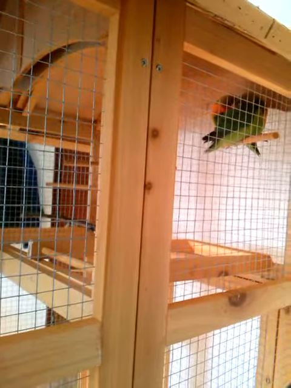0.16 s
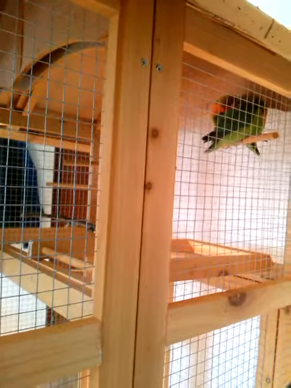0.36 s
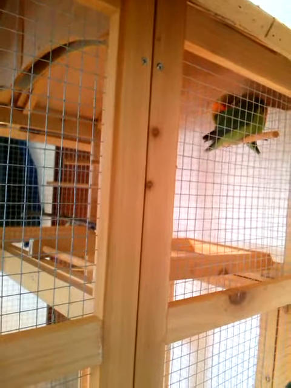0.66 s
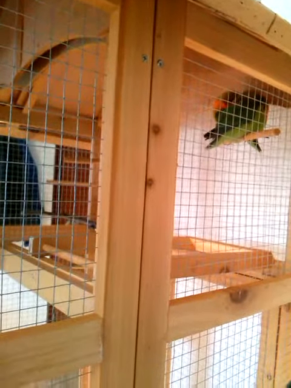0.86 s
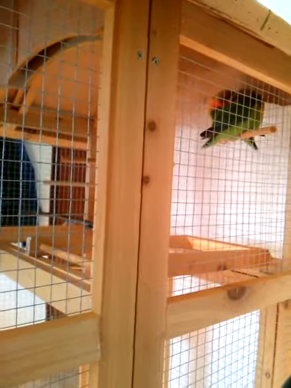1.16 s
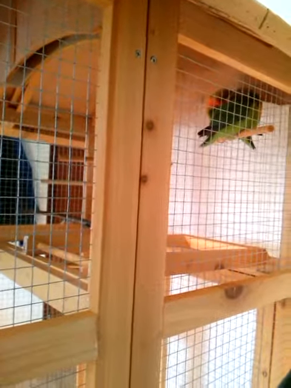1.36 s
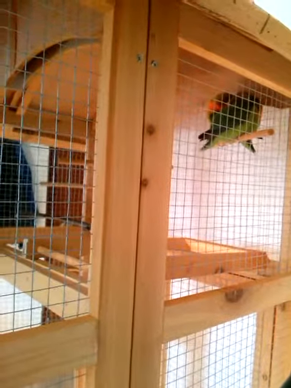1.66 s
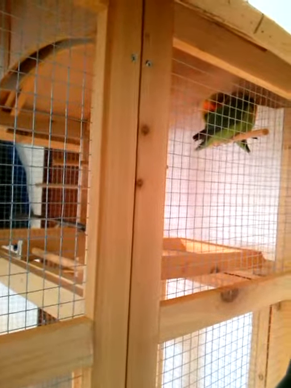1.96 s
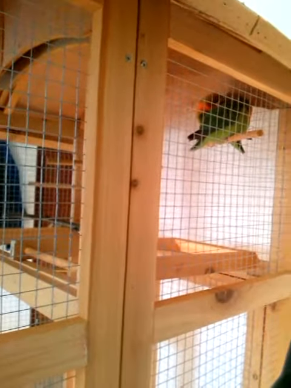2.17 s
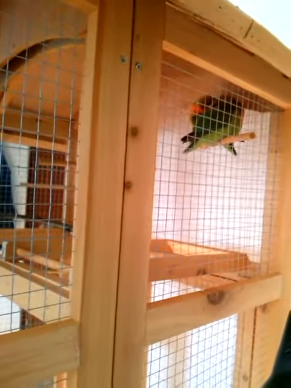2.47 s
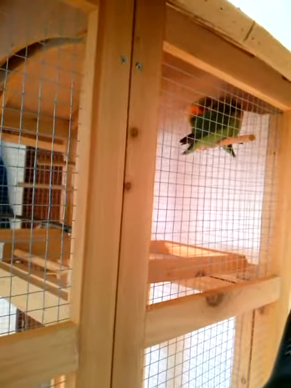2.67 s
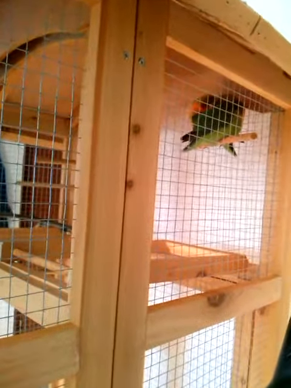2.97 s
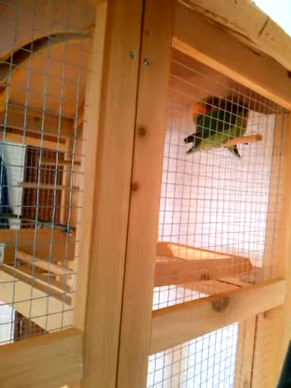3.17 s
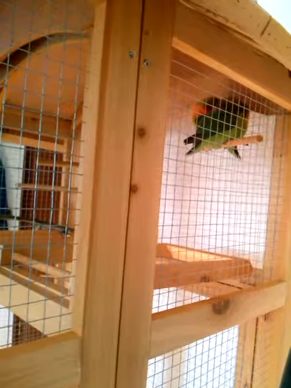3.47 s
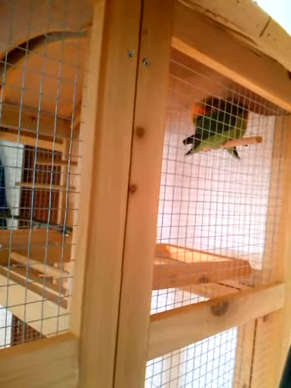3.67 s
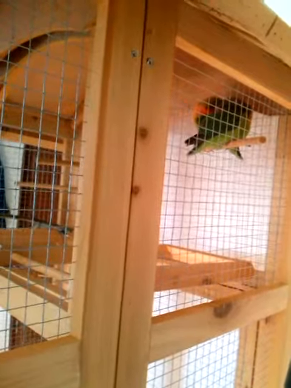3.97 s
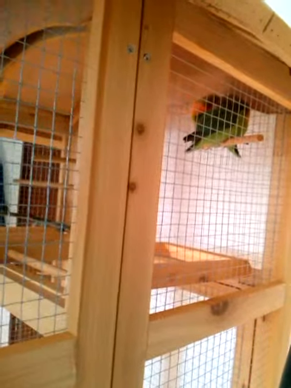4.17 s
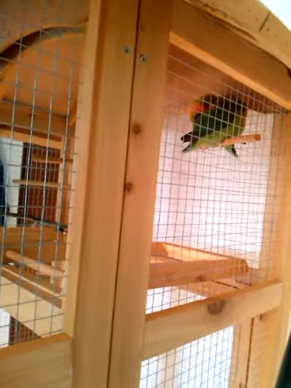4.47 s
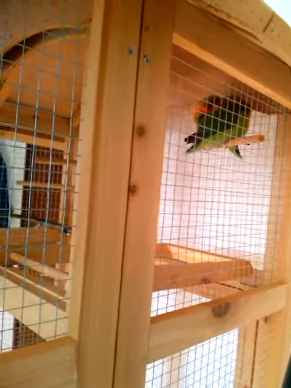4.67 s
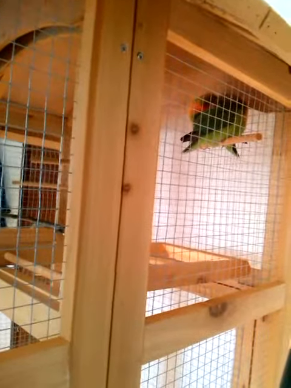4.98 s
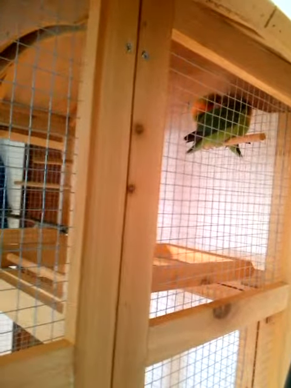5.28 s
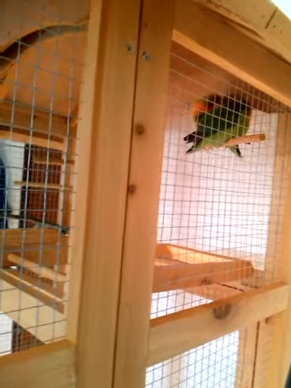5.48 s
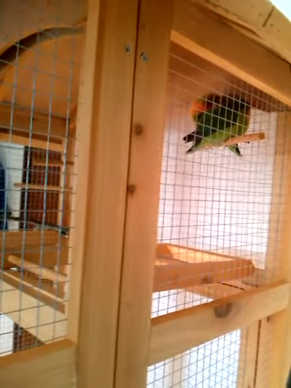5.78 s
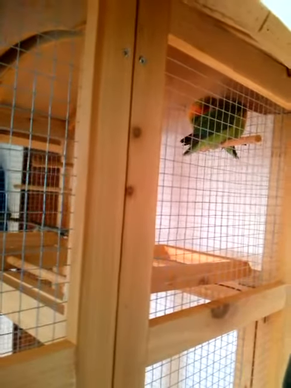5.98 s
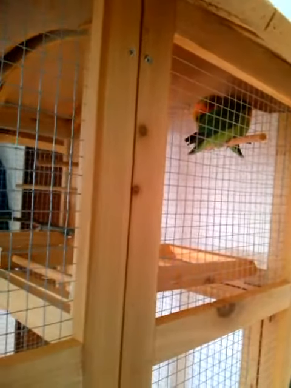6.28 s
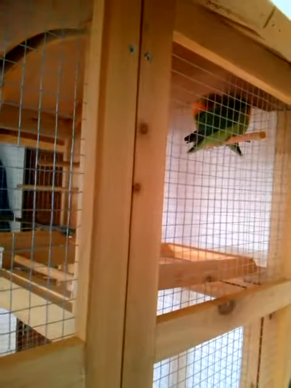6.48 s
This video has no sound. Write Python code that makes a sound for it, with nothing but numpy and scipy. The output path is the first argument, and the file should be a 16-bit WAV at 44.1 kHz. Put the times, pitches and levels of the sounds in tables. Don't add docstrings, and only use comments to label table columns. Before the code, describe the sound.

Very short, fast-gliding bird notes, some clear and piping, some nasal, raspy or rough, come from one small parrot. They cluster into quick bursts with gaps of up to about a second, the busiest in the second half. The microphone is fairly near in a lightly reverberant indoor room with a wooden enclosure. Underneath lies a very quiet low hum and soft noise, turned down gradually between calls.

```python
import sys
import numpy as np
from scipy import signal
from scipy.fft import rfft, irfft
from scipy.io import wavfile
from scipy.ndimage import uniform_filter1d

SR = 44100
rng = np.random.default_rng(int(sys.argv[2]) if len(sys.argv) > 2 else 0)


def int16_out(signal):
    q = np.round(np.clip(np.atleast_2d(signal).T, -1, 1) * 32767)
    wavfile.write(sys.argv[1], SR, q.astype(np.int16))


def attenuation_scalar(level_db):
    decades = np.asarray(level_db, float) / 20
    return 10 ** decades


N = 291942

# [start_s, length_ms, start_hz, end_hz, level_db]
SQUAWKS = [
    (0.0, 18, 4252, 5420, -32),
    (0.018, 20, 4334, 4160, -34.5),
    (1.581, 10.7, 2992, 3806, -34),
    (1.592, 6, 4400, 5700, -28),
    (1.598, 12, 5752, 5899, -28.5),
    (1.61, 13, 5567, 5164, -33),
    (1.828, 12.5, 2070, 2004, -45),
    (4.222, 13.88, 2199, 2476, -50),
    (5.995, 11.1, 2980, 2529, -37.5),
]
PEEPS = [
    (0.775, 8, 1660, 1709, -46),
    (0.8, 12, 1727, 1790, -58),
    (0.836, 18, 1904, 1980, -55.5),
    (0.866, 16, 1940, 1946, -59.5),
    (1.042, 14, 1833, 2020, -42.5),
    (2.945, 12, 1856, 1890, -42.5),
    (4.079, 5, 1586, 1560, -54),
    (4.7, 13, 2000, 2000, -42),
]
NASALS = [(0.66, 7, 2620, 2654, -49.5), (0.667, 13, 2854, 3160, -44.5), (1.165, 10.3, 3970, 3715, -42),
          (2.475, 9.3, 3493, 3170, -39.5), (2.757, 7, 4207, 4497, -31.5), (2.764, 6.5, 4682, 5566, -34.5),
          (3.803, 7.4, 2650, 3440, -47.5), (3.823, 9, 5760, 3600, -43), (3.878, 7.9, 5340, 5315, -34),
          (4.346, 13.5, 1857, 2346, -41), (4.36, 4.01, 4000, 5200, -40.5), (4.364, 6.02, 5398, 5900, -36),
          (4.514, 9.3, 4400, 4970, -39.5), (5.884, 12.4, 3592, 3834, -36.5), (5.896, 17, 3834, 3710, -40),
          (5.93, 21.5, 2938, 2843, -38)]
PINCHED = [
    (0.68, 12, 3550, 3508, -48.5),
    (0.93, 12, 3430, 3442, -53),
    (1.019, 8, 3206, 3376, -44.5),
    (1.14, 13, 3226, 3549, -45.5),
    (3.838, 12, 3500, 3330, -46),
    (3.872, 6, 3400, 5000, -50.5),
    (4.465, 15, 4420, 4216, -43.5),
    (5.278, 15, 3350, 3810, -43),
]
RASPS = [(0.918, 12, 1621, 3215, -45), (0.95, 6, 1645, 1520, -51.5), (1.718, 4.06, 3020, 3047, -47.5),
         (2.582, 3.37, 1123, 1135, -49.5), (2.59, 8.6, 3180, 3480, -44.5), (2.728, 9.9, 3700, 3499, -38),
         (2.738, 11.97, 3499, 3300, -44), (4.762, 12.1, 3216, 3150, -47), (5.265, 7.4, 3000, 3101, -43),
         (5.271, 7.02, 2887, 3202, -40.5), (5.39, 11.8, 4668, 4652, -42.5),
         (5.871, 12.8, 3407, 3040, -42.5), (6.327, 4.28, 2851, 3300, -37.5), (6.332, 6, 3300, 2900, -38.5),
         (6.338, 9, 4066, 4084, -36.5), (6.347, 6.4, 4540, 5496, -39)]
ROUGHS = [(1.726, 14.6, 1781, 1670, -43.5), (5.435, 20, 3612, 4400, -45), (1.027, 17.1, 2954, 1980, -40.5),
          (1.153, 11.8, 3400, 3020, -37.5), (1.817, 11.3, 3150, 2205, -34), (2.484, 8.08, 3205, 2900, -35),
          (2.492, 10, 2710, 2140, -41.5), (2.929, 12.5, 2920, 2180, -40.5), (4.386, 24, 2694, 2993, -38.5),
          (4.41, 21.6, 2977, 2990, -45), (4.607, 10.06, 2600, 1854, -41.5), (4.617, 9, 1823, 1607, -43.5),
          (4.687, 13.4, 3108, 2110, -37.5), (5.978, 18, 4380, 3690, -32), (6.029, 15.2, 3800, 3570, -37.5)]
PIPES = [(1.498, 9.1, 2700, 2200, -46), (1.507, 13, 2170, 2039, -45), (1.8, 8.8, 3090, 3360, -34),
         (1.809, 8, 3310, 3170, -31.5), (2.75, 7.4, 2950, 3910, -37), (3.831, 7, 3260, 2704, -40),
         (3.849, 23.34, 3604, 3363, -40), (4.438, 27, 3264, 2706, -38), (4.48, 17, 4560, 4000, -34.5),
         (4.497, 15.7, 3802, 3981, -31), (4.596, 4, 4550, 4200, -41.5), (4.6, 7, 3990, 2700, -35),
         (4.668, 9.96, 2840, 3245, -35.5), (4.678, 9, 3270, 3198, -33.5), (4.775, 22, 3105, 2573, -43.5),
         (5.295, 14.04, 3740, 3400, -37.5), (5.309, 9.74, 3336, 3062, -29.5),
         (5.319, 19, 3030, 2826, -33.5), (5.402, 18, 2300, 3204, -35), (5.42, 14.9, 3246, 3553, -36),
         (5.912, 18, 3723, 3050, -32), (6.005, 10.4, 2720, 3281, -31.5), (6.015, 10, 3290, 3333, -37)]
WHISTLES = [(1.897, 6.02, 5640, 5996, -33), (1.903, 18.7, 6304, 6760, -30.5), (2.687, 8, 6340, 6846, -27.5),
            (2.695, 25, 6880, 6880, -33.5), (2.72, 8, 6665, 4063, -31.5), (2.77, 18, 5660, 6110, -30),
            (4.37, 15.5, 6000, 5933, -34.5), (5.338, 6.02, 3300, 4698, -27), (5.344, 5.98, 4704, 6453, -28),
            (5.35, 10, 6270, 6270, -35), (5.95, 7.9, 5895, 6060, -36), (5.959, 17, 5995, 5350, -33.5)]

# [partial_2_db, partial_3_db, partial_4_db, breath_db, swell_db]
VOICES = [(-13.5, -20, -17.5, -17, -4), (-9, -5.5, -8.5, -28.5, 0.5), (-1.5, -5, -3.5, -20, -2.5),
          (-9, -5.5, -7, -21.5, -6), (-11, -12, -9, -12.5, -6), (-6.5, -19, -40, -22, -3.5),
          (6.5, -0.3, -4.5, -14, 2.5), (-8.5, -5.5, -16, -7, -3.5)]
HOARSENESS = (.2, .15, .25, .45, .7, .25, .2, .85)
GLIDE_EASE = (1.79, 1.8, 1.492, 1.8, 1.8, 2.2, 1.5, 1.5)
FALL_EASE = 1.2

# [centre_hz, width_hz, lift_db]
WINDPIPE = [(3300, 3400, 2.5), (6880, 3900, 2.5), (9420, 1700, 5), (14200, 490, 6), (15600, 2800, -4.5)]
# [centre_hz, width_hz, level_db]
LINGERING = [(2455, 87, -46), (3700, 480, -31), (5350, 480, -28.5), (7100, 900, -43.5), (11600, 680, -44)]
# [centre_hz, t60_s, level_db]
ROOM = [(1006.6, 0.86, 0.5), (1530, 0.48, -1), (2000, 0.4, 6), (2600, 0.36, -3.5), (3400, 0.39, 1.5),
        (4400, 0.44, -1.5), (5700, 0.34, -3.5), (7950, 0.39, -7.5), (12100, 0.24, -7)]
# [centre_hz, level_db per Hz]
ROOM_NOISE = [(12, -43), (20, -11), (32, -15), (68, -7), (85, -17.5), (107, -8.5), (145, -11.5),
              (268, -11.5), (300, -12.5), (345, -13), (2500, -23), (11300, -27), (15800, -28)]
# [start_s, peak_db, pitch_hz]
CLUCKS = [(0.939, -50, 762), (1.161, -54.5, 1112), (1.519, -54.5, 1119), (1.726, -53.5, 912),
          (2.582, -52.5, 1288), (2.733, -52, 1286), (2.941, -54, 890), (4.416, -47.5, 1273),
          (4.773, -50, 1070), (5.385, -47, 1160), (5.942, -51, 1274), (6.326, -57, 1107)]

OVERTONE_TOP_HZ, OVERTONE_FALL_DB = 14500, 75.5
BREATH_AT_DB, BREATH_LAG = -35.5, 0.44
ONSET_SWELL_DB, ENDING_FADE_DB = 3.5, -4.5
JOINED_S = 0.004
PUFF_S, PUFF_DB = 0.0016, 1
BOX_T60_S, BOX_DB = 0.05, 0
ROOM_NOISE_DB = -58.5
HUM_HZ, HUM_DB = 99.6, -68
HISS_DB = -81.5
OFFSET = -0.0005


def rms_one(x):
    return x / np.sqrt(np.mean(x ** 2) + 1e-20)


def at_hz(points, hz, axis=1):
    points = np.array(points)
    return np.interp(np.log(hz), np.log(points[:, 0]), points[:, axis])


def band(x, low_hz, high_hz):
    sos = signal.butter(2, [low_hz, min(high_hz, 0.45 * SR)], "band", fs=SR, output="sos")
    return signal.sosfilt(sos, x)


def wobble(low_hz, high_hz):
    return rms_one(band(rng.standard_normal(N), low_hz, high_hz))


def smooth(x, ms):
    size = max(round(ms * SR / 1000), 1)
    once = uniform_filter1d(x, size, mode="nearest")
    return uniform_filter1d(once, size, mode="nearest")


def syrinx_controls():
    hz, hoarse, gains = np.zeros(N), np.zeros(N), np.zeros((5, N))
    tables = (PEEPS, PIPES, NASALS, ROUGHS, SQUAWKS, WHISTLES, PINCHED, RASPS)
    notes = sorted((*row, voice) for voice, table in enumerate(tables) for row in table)
    begins = np.array([note[0] for note in notes])
    ends = np.array([note[0] + note[1] / 1000 for note in notes])
    pauses = np.r_[True, begins[1:] - ends[:-1] > JOINED_S, True]
    free = 0
    for note, first, last in zip(notes, pauses, pauses[1:]):
        start_s, length_ms, start_hz, end_hz, level_db, voice = note
        i = max(round(start_s * SR), 0)
        u = np.linspace(0, 1, round(length_ms * SR / 1000))
        hz[min((free + i) // 2, i):] = start_hz
        free = i + len(u)
        ease = GLIDE_EASE[voice] * (FALL_EASE if end_hz < start_hz else 1)
        hz[i:free] = end_hz + (start_hz - end_hz) * (1 - u) ** ease
        hz[free:] = end_hz
        *overtones_db, breath_db, swell_db = VOICES[voice]
        breath_db = breath_db - BREATH_LAG * (level_db - BREATH_AT_DB)
        colour_db = np.array([0, *overtones_db, breath_db])
        swell_db += ONSET_SWELL_DB * first + ENDING_FADE_DB * last
        gains[:, i:] = 0
        gains[:, i:free] = attenuation_scalar(level_db + colour_db[:, None] + swell_db * (u - 0.5))
        gains[4, i:i + round(PUFF_S * SR)] *= attenuation_scalar(PUFF_DB * first)
        hoarse[i:] = HOARSENESS[voice]
    octaves_above = np.log2(np.maximum(np.arange(3, 5)[:, None] * hz / OVERTONE_TOP_HZ, 1))
    gains[2:4] *= attenuation_scalar(-OVERTONE_FALL_DB * octaves_above)
    return smooth(hz, 0.5), smooth(gains, 0.3), hoarse


def windpipe(hz):
    lift_db = sum(db / (1 + (2 * (hz - centre) / width) ** 2) for centre, width, db in WINDPIPE)
    return attenuation_scalar(lift_db - 3.0)


def parrot():
    hz, gains, hoarse = syrinx_controls()
    jitter = (0.004 + 0.055 * hoarse) * wobble(150, 900)
    phase = 2 * np.pi * np.cumsum(hz * (1 + jitter)) / SR
    tone = np.zeros(N)
    for k in range(1, 6):
        gain = gains[k - 1] if k < 5 else gains[3] * attenuation_scalar(-2.0)
        flutter = 1 + 0.42 * wobble(40, 200) + 0.66 * hoarse * wobble(150, 530)
        gain = np.sqrt(2) * gain * windpipe(k * hz) * (k * hz < 16000)
        tone += gain * flutter * np.sin(k * phase)
    halves = attenuation_scalar(-42.5) * np.sin(phase / 2) + attenuation_scalar(-13.5) * np.sin(3 * phase / 2)
    tone += gains[0] * hoarse ** 2 * wobble(32.6, 160) * halves
    puffs = 1 + 0.29 * np.cos(phase)
    breath = band(wobble(2100, 16000), 1700, 15000) * puffs
    return tone + attenuation_scalar(1.5) * gains[4] * breath


def lingering():
    t = np.arange(N) / SR
    out = np.zeros(N)
    for hz, width, level_db in LINGERING:
        fade = attenuation_scalar(level_db - 60 * t / at_hz(ROOM, hz))
        out += fade * wobble(hz - width / 2, hz + width / 2)
    return out


def aviary(x):
    t = np.arange(round(0.8 * SR)) / SR
    white = rng.standard_normal((3, len(t)))
    edges = 600 * 2 ** np.arange(0, 5.1, 1 / 3)
    tail = np.zeros(len(t))
    for k, (low, high) in enumerate(zip(edges, edges[1:])):
        hz = np.sqrt(low * high)
        fall = attenuation_scalar(-60 * t / at_hz(ROOM, hz))
        level = attenuation_scalar(at_hz(ROOM, hz, axis=2)) / np.sqrt(np.sum(fall ** 2))
        tail += level * band(white[k % 2], low, high) * fall
    tail *= np.clip((t - 0.003) / 0.021, 0, 1)
    box = white[2] * attenuation_scalar(-60 * t / BOX_T60_S) * (t > 0.002)
    box *= attenuation_scalar(BOX_DB) / np.sqrt(np.sum(box ** 2))
    return signal.fftconvolve(x, tail + box)[:N]


def room_noise():
    hz = np.maximum(np.arange(N // 2 + 1) * SR / N, 10)
    noise = irfft(rfft(rng.standard_normal(N)) * attenuation_scalar(at_hz(ROOM_NOISE, hz)), N)
    hum = np.sqrt(2) * np.sin(2 * np.pi * HUM_HZ * np.arange(N) / SR)
    hum *= 1 + 0.17 * wobble(1.5, 8.0)
    return attenuation_scalar(ROOM_NOISE_DB) * rms_one(noise) + attenuation_scalar(HUM_DB) * hum


def clucks():
    out = np.zeros(N)
    u = np.linspace(0, 1, round(0.019 * SR))
    swell = np.sin(np.pi * u ** 0.41)
    shake = 0.5 + wobble(60, 450)
    for start_s, peak_db, pitch_hz in CLUCKS:
        i = round(start_s * SR)
        tone = np.sin(2 * np.pi * pitch_hz * np.arange(len(u)) / SR)
        out[i:i + len(u)] += attenuation_scalar(peak_db - 1.0) * swell * tone
    return out * shake


def scene():
    bird = parrot() + clucks()
    mix = bird + aviary(bird) + lingering() + room_noise()
    return mix[None]


def expander(x, open_db, slope, release_db_s, attack_s):
    sink = release_db_s * np.arange(N) / SR
    level_db = 10 * np.log10(smooth(x ** 2, 42.0) + 1e-12)
    held_db = np.maximum.accumulate(level_db + sink, axis=-1) - sink
    keep = np.exp(-1 / (attack_s * SR))
    gain_db = slope * np.minimum(held_db - open_db, 0)
    return x * attenuation_scalar(signal.lfilter([1 - keep], [1, -keep], gain_db))


def roll_off(x):
    return signal.sosfilt(signal.butter(12, 15960, fs=SR, output="sos"), x)


def record(dry):
    x = expander(dry, open_db=-40.5, slope=0.47, release_db_s=53.5, attack_s=0.068)
    x = 0.24 * np.tanh(x / 0.24)
    hiss = attenuation_scalar(HISS_DB) * wobble(4500, 18000)
    top_cut = signal.cheby2(14, 50, 16100, fs=SR, output="sos")
    x = signal.sosfilt(top_cut, x + hiss)
    return roll_off(x + OFFSET)


dry = scene()
out = record(dry)
int16_out(out)
```